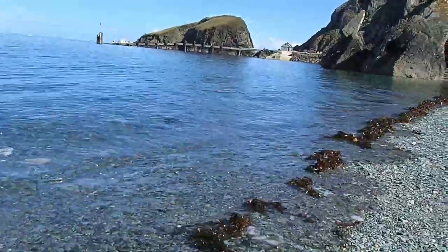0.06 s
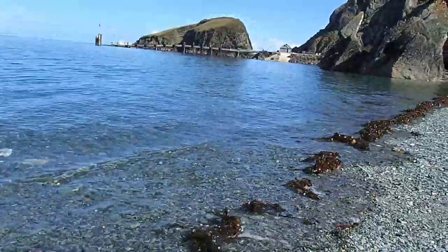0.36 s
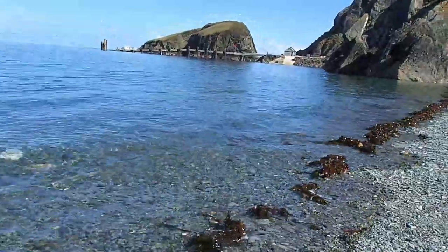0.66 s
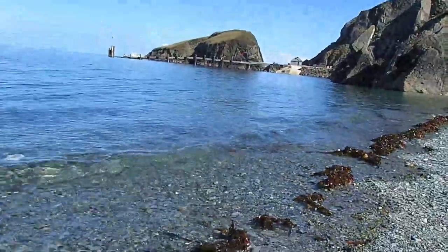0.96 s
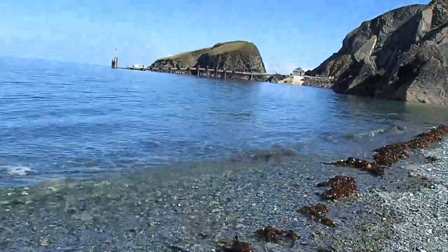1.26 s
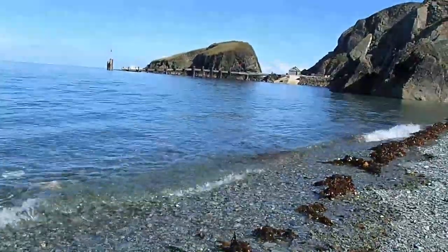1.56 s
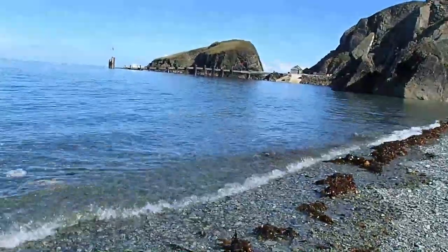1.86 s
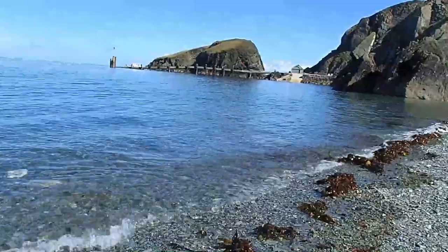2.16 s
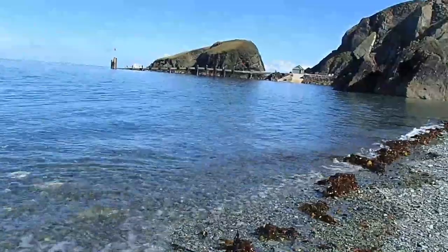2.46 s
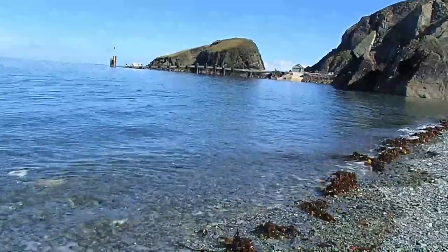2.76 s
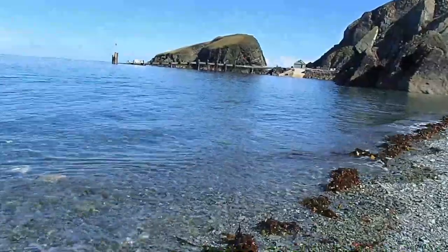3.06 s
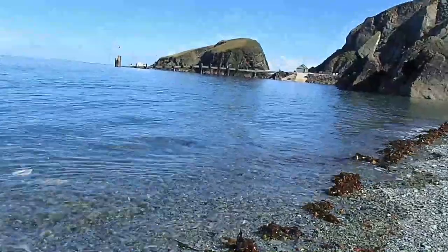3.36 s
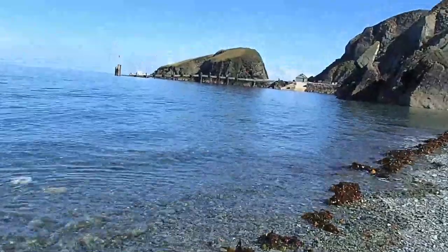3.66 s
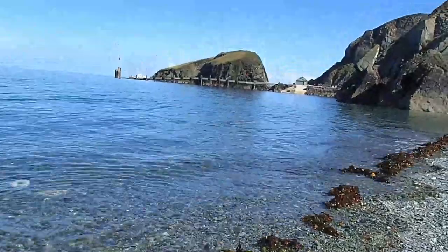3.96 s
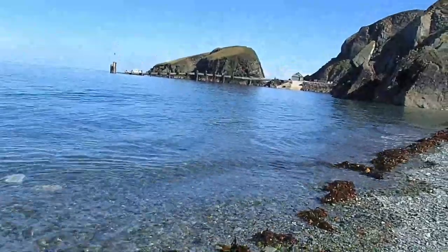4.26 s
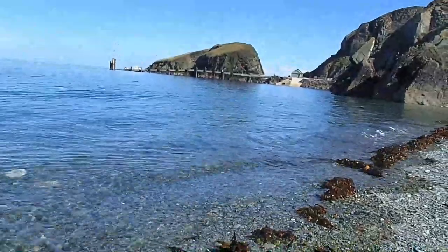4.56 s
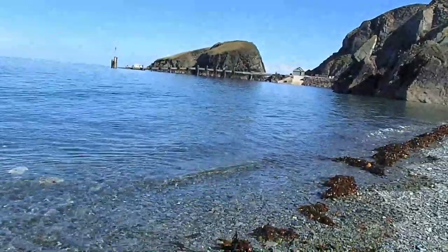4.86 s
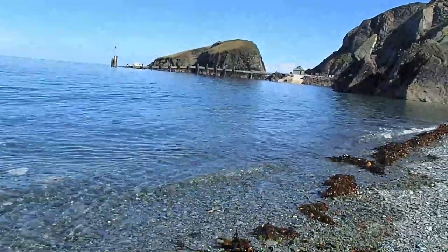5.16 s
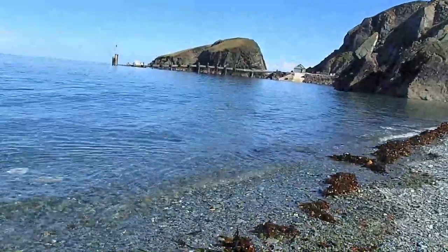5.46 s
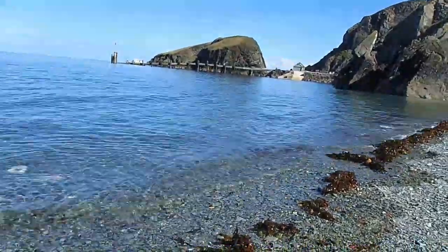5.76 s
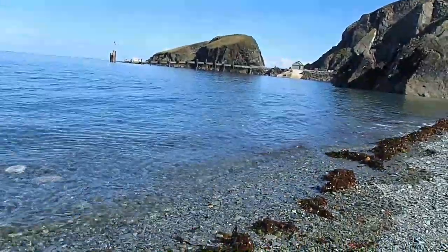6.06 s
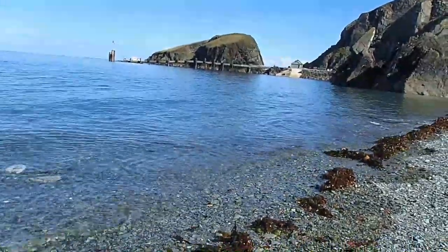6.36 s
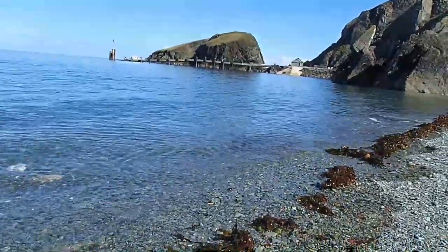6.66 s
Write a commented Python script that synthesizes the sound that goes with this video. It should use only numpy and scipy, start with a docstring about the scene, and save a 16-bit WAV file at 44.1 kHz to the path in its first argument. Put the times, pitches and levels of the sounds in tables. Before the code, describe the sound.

Small waves wash a pebble beach, heard from a few steps away over a faint low sea rumble and light hiss. At first, wet stones fizz softly while sharp ticks sound right at the microphone, the loudest at about 0.8 seconds, with a dull bump, and at 1.3 seconds. From 1 second a wave gathers and folds over, peaking near 2 seconds in a bubbling splash and bright foam, with another tick and soft bumps. It drains away through the pebbles, with small plops, splashes and a few light ticks around 3 seconds. The water laps quietly until about 4.8 seconds, when a second, gentler wave rises and washes in, with a tick at 5 seconds and a cluster of plops and splashes around 5.5 seconds. A smaller wash with more plops follows near 6.4 seconds and eases off.

```python
"""A shingle beach, a few steps from a hand-held camera. Small waves fold over and wash up.
Each gathers, traps big bubbles, splashes small ones and leaves fizzing foam and a backwash of pebbles.
Wet stones fizz; the sea rumbles low behind. Sharp ticks and dull bumps sound at the camera.
Its microphone ports ring near 5 kHz; the loudest ticks duck its gain control."""
import sys
import numpy as np
from scipy import signal
from scipy.fft import rfft, irfft, next_fast_len
from scipy.io import wavfile
from scipy.ndimage import map_coordinates

SR = 44100
rng = np.random.default_rng(int(sys.argv[2]) if len(sys.argv) > 2 else 0)


def persist_wave(psi):
    """Save psi, clipped to +-1, as 16-bit WAV."""
    counts = np.round(np.clip(psi, -1, 1) * 32767).astype(np.int16)
    wavfile.write(sys.argv[1], SR, np.atleast_2d(counts).T)


N = 304290

# Waves folding over: start_s, rise_s, decay_s, plunge_db, wash_db, foam_db
BREAKERS = [(.49, 0.13, 5.9, -66, -59, -44.5), (1.0, 0.21, 3.8, -42.5, -37.5, -35.5),
            (1.35, 0.12, 1.2, -40, -40.5, -38), (1.44, 0.42, 2, -32.5, -31, -30.5),
            (2.66, .12, 6.1, -61, -52, -48.5), (3.072, 0.025, 1.16, -65, -48, -44),
            (3.45, 0.37, 2.4, -49.5, -48.5, -63), (4.78, 0.14, 2.9, -55, -46, -51),
            (4.92, 0.17, 3.6, -45.5, -44, -41), (5.06, 0.32, 1.2, -40, -41.5, -43.5),
            (5.55, 0.025, 2.54, -45, -44, -45.5), (6.36, 0.1, 1.8, -46, -46.5, -48),
            (6.66, 0.12, 3.0, -55, -51.5, -52)]
# Large bubbles under the crest: freq_hz, density_db
PLUNGE_SPECTRUM = [(50, -44), (130, -14.5), (260, -4.5), (400, -4), (600, 3), (900, -5.5), (2000, -19),
                   (5000, -62)]
# Small bubbles in the wash: freq_hz, density_db
WASH_SPECTRUM = [(40, -38), (200, -19.5), (450, -8), (700, -1), (1000, 1), (1500, -4), (2200, -8),
                 (3200, -18.5), (5000, -34.5), (15000, -42)]
# Foam and pebbles: freq_hz, density_db
FOAM_SPECTRUM = [(500, -47), (2000, 1), (4000, -3), (6000, 3), (9000, -2), (12000, -5.5), (16000, 0.5)]
# Water tossed against stones: start_s, level_db, t60_s
SPLASH_EVENTS = [(2.47, -51.5, 0.43), (2.839, -55.5, 1.9), (3.11, -51, 1.4), (4.995, -51, 2.9),
                 (5.585, -52, 0.36), (5.759, -56.5, 0.79), (6.02, -57, 0.96), (6.75, -68, 2.0)]
# Falling drops: freq_hz, density_db
DROP_SPECTRUM = [(700, -32), (1300, 7), (2200, -0.5), (3100, -2.5), (4200, -25), (8000, -3.5), (14000, -23)]
# Single slaps of water: start_s, level_db, pitch_hz
PLOP_EVENTS = [(1.977, -25, 850), (2.698, -27, 1080), (3.1, -30, 1220), (3.135, -29.5, 1360),
               (4.098, -33.5, 916), (5.05, -27.5, 1028), (5.419, -23.5, 1000), (5.589, -33, 1570),
               (5.631, -28, 1480), (5.685, -29, 1000), (6.507, -32, 1200), (6.58, -29.5, 1170)]
# Fizz of wet shingle: freq_hz, density_db
FIZZ_SPECTRUM = [(2500, -14), (5000, -10.5), (7000, -4), (10000, -1), (12000, -2), (15500, -8)]
# Lone bubbles: start_s, level_db, pitch_hz
PING_EVENTS = [(0.206, -49, 243), (.365, -47, 566), (0.9954, -31.5, 8200), (1.065, -39, 1230),
               (1.181, -30, 543), (2.5096, -45, 6050), (4.319, -51, 7450), (5.238, -35, 910),
               (6.575, -40, 903)]
# Ticks near the microphone, plus one close clatter of pebbles at 2.1 s: start_s, level_db, pan_left_db
TICK_EVENTS = [(0.3111, -25, 0), (.5605, -23, 6), (0.6202, -19.5, 10), (.626, -12.5, 2),
               (0.7695, -18.5, 17), (0.7741, -12.5, 17), (0.7783, -0.5, -11), (0.878, -20.5, -1),
               (1.2966, -1, 6), (1.379, -21, 7), (2.0986, -9.5, -1), (3.112, -21, 10), (3.128, -20, 3),
               (3.184, -21.5, 0), (4.9956, -16, 4), (5.002, -18, -5), (6.755, -25, 0)]
# Tone of a tick: freq_hz, gain_db
TICK_RESPONSE = [(100, -9), (1000, 5.5), (3000, -6), (5000, 1.5), (8000, 4.5), (11000, 3), (15000, 0)]
# Bumps on the camera body: start_s, level_db
BUMP_EVENTS = [(.07, -43), (0.7744, -23), (0.78, -18), (0.99, -35), (1.95, -30), (2.099, -33), (2.439, -33),
               (3.111, -36)]
# Thud of the body: freq_hz, density_db
BUMP_SPECTRUM = [(20, -20), (70, 6), (250, 8), (600, -3.5), (1500, -49), (4000, -58)]
# Open-water rumble: freq_hz, density_db
SEA_SPECTRUM = [(20, -14), (45, -5), (72, 4), (110, 2.5), (170, -4), (260, 4), (380, -9), (700, -14.5),
                (1500, -11.5), (4000, -29)]
# Surf far along the bay: freq_hz, density_db
FAR_SURF_SPECTRUM = [(80, -21), (220, -2.5), (430, 2), (900, -0.5), (1500, -8), (2500, -15), (5000, -35)]
# Microphone port resonances: centre_hz, width_hz, gain_db
PORT_PEAKS = [(1147, 700, 1.5), (1660, 600, 4.5), (2223, 470, 4), (3080, 540, 9.5), (3670, 160, 10.5),
              (4556, 204, 18), (5243, 686, 24.5), (5750, 2040, 15.5), (7810, 1600, 10.5)]
# Cancellations between the resonances: centre_hz, width_hz, gain_db
PORT_NULLS = [(1882, 82, -8), (4780, 75, -5.5)]
# Camera self-noise: freq_hz, density_db
HISS_SPECTRUM = [(1000, 9), (4000, -25), (7000, 6), (15000, 4.5)]

PORT_LAG_S, WAVE_LEAD_S = 4.9e-5, 1.5e-5  # port-to-port travel; lead of the waves at the left port


def waves(plunge_db, wash_db, foam_db):
    """The crest traps large bubbles, the wash small ones; foam and rolling pebbles crackle on top."""
    slosh = wobble(28)  # spills lift all layers together
    distinct = amp(-.35 * np.maximum(wash_db + 43.5, 0))  # a full breaker merges bubbles into a rush
    gulps = grains(PLUNGE_SPECTRUM, 163, 911, q=15, spread_db=2, glide=.02, count=600, samples=1200)
    plunge = mingle(rush(PLUNGE_SPECTRUM), gulps, distinct * amp(1.5))
    plunge *= amp(plunge_db - 4 + 0.25 * slosh)
    bubbles = grains(WASH_SPECTRUM, 481.3, 2406, q=18.6, spread_db=2, glide=.011, count=1700, samples=760)
    wash = mingle(rush(WASH_SPECTRUM), bubbles, distinct)
    wash *= amp(wash_db - 6 + 0.9 * slosh + 0.76 * wobble(70))
    pebbles = grains(FOAM_SPECTRUM, 3660, 12100, q=5.9, spread_db=2.5, glide=0, count=11000, samples=64)
    foam = mingle(rush(FOAM_SPECTRUM), pebbles, distinct * amp(-2.5))
    foam *= amp(foam_db - 13 + 1.3 * slosh + 1.18 * wobble(90))
    return plunge + wash + panned(foam, left_db=0.5)


def surge_db(crests_db, hold, haste, calm_db, rise_power=0.7):
    """Each wave gathers, holds for a share of its rise time and dies away to calm water."""
    t = np.arange(0, N / SR, .002)
    power = np.zeros(len(t))
    for (start_s, rise_s, decay_s, *_), crest_db in zip(BREAKERS, crests_db):
        gathered = np.clip((t - start_s) / rise_s, 0, 1) ** rise_power
        spent_s = np.maximum(t - start_s - rise_s * (1 + hold), 0)
        power += (gathered * amp(crest_db - 60 * haste * spent_s / decay_s)) ** 2
    return 10 * np.log10(np.interp(np.arange(N) / SR, t, power) + amp(calm_db) ** 2)


def wave_levels_db(backwash_db=-10.5, backwash_s=0.75):
    """The plunge ends first, the wash runs on, the foam trails into pebbles rolling back."""
    *_, plunges, washes, foams = np.transpose(BREAKERS)
    ripples_db = -61.5 + np.arange(N) / SR  # lapping grows 1 dB/s
    plunge_db = surge_db(plunges, hold=0.091, haste=1.18, calm_db=ripples_db - 6.5)
    wash_db = surge_db(washes, hold=0.4, haste=0.86, calm_db=ripples_db)
    foam_db = surge_db(foams, hold=0.13, haste=1.05, calm_db=-59.5)
    backwash_power = smooth(amp(foam_db + backwash_db) ** 2, backwash_s)
    return plunge_db, wash_db, 10 * np.log10(amp(foam_db) ** 2 + backwash_power)


def splashes(attack_s=0.0011):
    """Tossed water falls back as a dying shower of small drops."""
    level, t = np.zeros(N + SR), np.arange(SR) / SR
    for start_s, level_db, t60_s in SPLASH_EVENTS:
        add_at(level, start_s, amp(level_db - 60 * t / t60_s) * (1 - np.exp(-t / attack_s)))
    drops = grains(DROP_SPECTRUM, 1150, 3400, q=11, spread_db=2.6, glide=.0055, count=3000, samples=180)
    return level[:N] * mingle(rush(DROP_SPECTRUM), drops, 1)


def plops(t60_s=0.03, spacing_s=0.003):
    """A slap of water traps five bubbles, the first the strongest."""
    out, t = np.zeros(N + SR), np.arange(SR // 20) / SR
    for start_s, level_db, pitch_hz in PLOP_EVENTS:
        for k, (late, detune) in enumerate(rng.random((5, 2))):
            scatter = min(k, 1)
            hz = pitch_hz * 2 ** ((detune - .5) * scatter)
            ring = np.sin(2 * np.pi * hz * t * (1 + 3 * t)) * amp(-60 * t / t60_s)
            add_at(out, start_s + spacing_s * (k + late * scatter), amp(level_db - 6.5 - 6 * k) * ring)
    return out[:N]


def wet_shingle(foam_db, wet_db=-53.5, drying_db_per_s=2.5, soak_db=-20, trickle_db=-66):
    """Water films burst between stones, near left; the stones dry until foam soaks them again."""
    bursts = grains(FIZZ_SPECTRUM, 3640, 15800, q=34, spread_db=-1, glide=0, count=6000, samples=80)
    fizz = mingle(rush(FIZZ_SPECTRUM, coherence=0.89), bursts, amp(-2.5))
    drying_db = wet_db - drying_db_per_s * np.arange(N) / SR
    level = np.sqrt(amp(drying_db) ** 2 + amp(foam_db + soak_db) ** 2 + amp(trickle_db) ** 2)
    return panned(fizz, left_db=2) * level


def pings():
    """Lone bubbles ring and glide up as they surface; large ones ring longer."""
    out, t = np.zeros(N + SR), np.arange(SR // 10) / SR
    for start_s, level_db, pitch_hz in PING_EVENTS:
        t60_s = 0.023 * (8200 / pitch_hz) ** 0.49
        envelope = amp(level_db - 60 * t / t60_s) * (1 - np.exp(-t * pitch_hz))
        add_at(out, start_s, envelope * np.sin(2 * np.pi * (pitch_hz + 1500 * t) * t))
    return out[:N]


def ticks(snap_t60_s=0.011, scrape_t60_s=0.036):
    """Each hard contact is one snap with a brief scrape behind it."""
    out, t = np.zeros((2, N + SR)), np.arange(SR // 30) / SR
    envelope = 0.12 * amp(-60 * t / snap_t60_s) + 0.012 * amp(-60 * t / scrape_t60_s)
    for start_s, level_db, left_db in TICK_EVENTS:
        snap = rng.standard_normal((2, len(t))) * envelope
        snap[:, :2] += [.6, .4]  # contact impulse
        add_at(out, start_s, amp(level_db - 5.5) * panned(snap, left_db))
    return filtered(out[:, :N], lambda hz: colour(TICK_RESPONSE, hz))


def bumps(attack_s=0.00056, t60_s=0.032):
    """Short, low thuds through the camera body."""
    force, t = np.zeros(N + SR), np.arange(SR // 8) / SR
    for start_s, level_db in BUMP_EVENTS:
        add_at(force, start_s, amp(level_db - 4.5 - 60 * t / t60_s) * (1 - np.exp(-t / attack_s)))
    return force[:N] * rush(BUMP_SPECTRUM, coherence=0.13)


def sea():
    """Open water rumbles; distant surf arrives from all around the bay."""
    rumble = amp(-60 + 1.07 * wobble(8.1) + 1.3 * wobble(22)) * rush(SEA_SPECTRUM, coherence=0.91)
    far_surf = amp(-61 + 0.54 * wobble(3.54)) * rush(FAR_SURF_SPECTRUM, coherence=0.05)
    return rumble + far_surf


def grains(spectrum, low_hz, high_hz, q, spread_db, glide, count, samples):
    """Bubbles or contacts: damped sines at random times, each from its own direction."""
    when, pitch, strength, life = rng.random((count, 4)).T[..., None]
    lag_s = PORT_LAG_S * rng.uniform(-1, 1, (count, 1))
    hz = low_hz * (high_hz / low_hz) ** pitch
    decay_per_cycle = np.float32(np.pi / (q * (.5 + life)))
    rarity = -np.log(strength + .015)  # long-tailed level spread
    gain = amp(spread_db * rarity) * colour(spectrum, hz) * hz
    index = (when * N).astype(int) + np.arange(samples)
    pair = []
    for side in (-.5, .5):
        t = np.arange(-2, samples - 2) / SR + side * lag_s
        cycles = np.maximum(np.float32(hz * t), 0)
        age = decay_per_cycle * cycles
        envelope = np.exp(-age) * np.minimum(2 * cycles, 1)
        ring = envelope * np.sin(2 * np.pi * cycles * (1 + glide * age))
        pair.append(np.bincount(index.ravel(), (gain * ring).ravel(), N)[:N])
    return unit(np.array(pair))


def rush(spectrum, coherence=1):
    """Diffuse stereo noise: the ports agree less as pitch rises."""
    def shape(hz):
        likeness = coherence * np.sinc(2 * hz * PORT_LAG_S)
        return colour(spectrum, hz) * np.sqrt([1 + likeness, 1 - likeness])
    mid, side = filtered(rng.standard_normal((2, N)), shape)
    return unit(np.array([mid + side, mid - side]))


def mingle(bed, detail, share):
    """Grains on a noise bed, at constant power."""
    return (bed + share * detail) / np.sqrt(1 + share ** 2)


def from_left(x):
    """Sound from the left reaches that port first."""
    return filtered(x, lambda hz: np.exp(1j * np.pi * hz * WAVE_LEAD_S * np.array([[1], [-1]])))


def panned(x, left_db):
    """Left over right by left_db."""
    return x * amp(np.array([[.5], [-.5]]) * left_db)


def amp(db):
    """Decibels to gain."""
    return 10 ** (np.asarray(db) / 20)


def unit(x):
    """Scale to rms 1."""
    return x / np.sqrt(np.mean(x ** 2) + 1e-20)


def colour(points, hz):
    """Gain from (freq_hz, db) points on a log axis."""
    freq_hz, db = np.transpose(points)
    return amp(np.interp(np.log(hz + 1), np.log(freq_hz + 1), db))


def wobble(knots_per_s):
    """Smooth random curve."""
    return map_coordinates(rng.standard_normal(2048), [np.arange(N) * knots_per_s / SR], mode="wrap")


def filtered(x, response):
    """Apply a frequency response."""
    size = next_fast_len(N + SR // 4)
    return irfft(rfft(x, size) * response(np.fft.rfftfreq(size, 1 / SR)), size)[..., :N]


def smooth(x, tau_s):
    """One-pole lag."""
    pole = np.exp(-1 / (tau_s * SR))
    return signal.lfilter([1 - pole], [1, -pole], x)


def add_at(out, start_s, x):
    """Mix x in at start_s."""
    out[..., round(start_s * SR):][..., :x.shape[-1]] += x


def scene():
    """Everything that reaches the camera."""
    plunge_db, wash_db, foam_db = wave_levels_db()
    water = from_left(waves(plunge_db, wash_db, foam_db) + splashes() + plops())
    return water + wet_shingle(foam_db) + pings() + ticks() + bumps() + sea()


def ports(hz):
    """Minimum-phase response of the cavities in front of the microphones."""
    def bell(centre_hz, width_hz):
        return (1 + 2 * ((hz - centre_hz) / width_hz) ** 2) ** -3.0
    power = 1 + sum(amp(db) ** 2 * bell(centre, width) for centre, width, db in PORT_PEAKS)
    nulls_db = sum(db * bell(centre, width * 2) for centre, width, db in PORT_NULLS)
    cepstrum = irfft(np.log(np.sqrt(power) * amp(nulls_db)))
    half = len(cepstrum) // 2
    cepstrum[1:half] *= 2
    cepstrum[half + 1:] = 0
    return np.exp(rfft(cepstrum))


def gain_control(x, threshold_db, recovery_db_per_s, attack_s):
    """A peak pulls the gain down; it climbs back at a steady rate."""
    peak_db = 20 * np.log10(np.abs(x).max(axis=0) + 1e-9)
    over_db = np.maximum(peak_db - threshold_db, 0)
    climb_db = recovery_db_per_s * np.arange(N) / SR
    duck_db = np.maximum.accumulate(over_db + climb_db) - climb_db
    return x * amp(-smooth(duck_db, attack_s))


def record(dry):
    """Ringing ports, hiss, gain control, band limit."""
    heard = filtered(dry, ports) + amp(-57.5) * rush(HISS_SPECTRUM, coherence=0)
    ducked = gain_control(heard, threshold_db=-7, recovery_db_per_s=90, attack_s=0.00034)
    return filtered(ducked, lambda hz: hz < 15850)


dry = scene()
out = record(dry)
persist_wave(out)
```